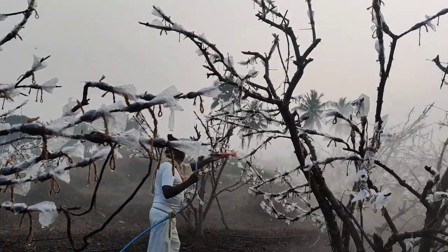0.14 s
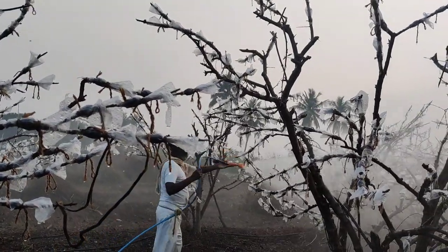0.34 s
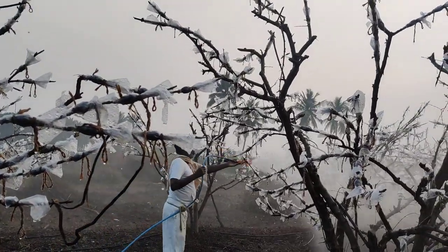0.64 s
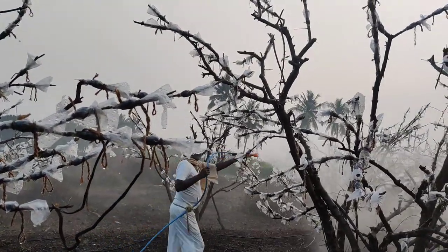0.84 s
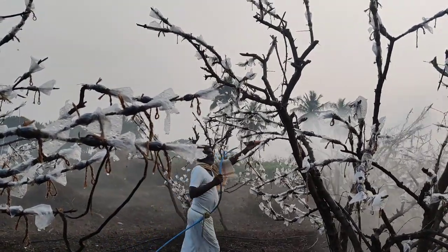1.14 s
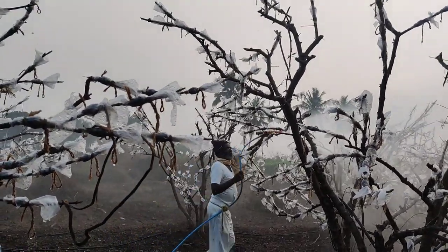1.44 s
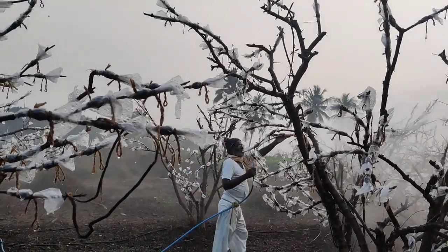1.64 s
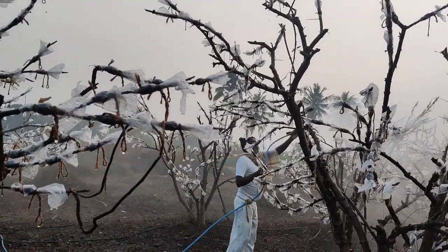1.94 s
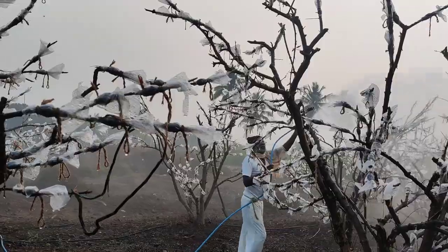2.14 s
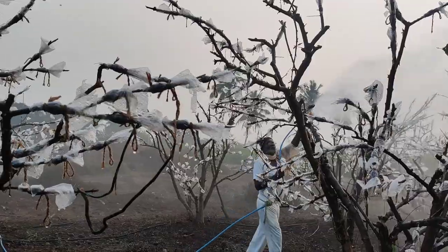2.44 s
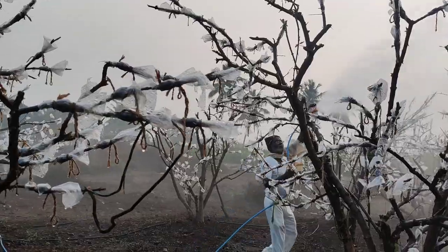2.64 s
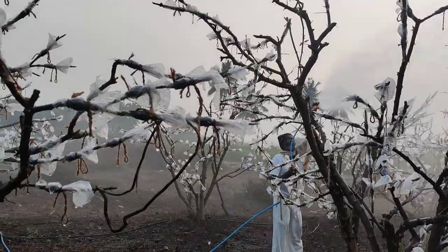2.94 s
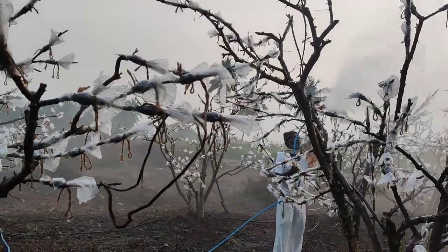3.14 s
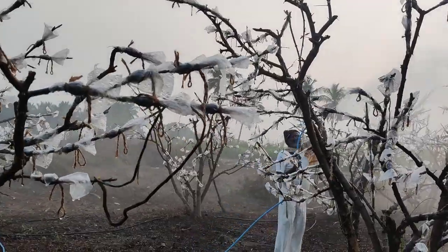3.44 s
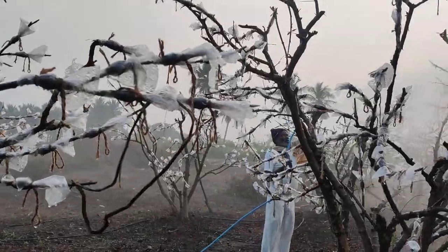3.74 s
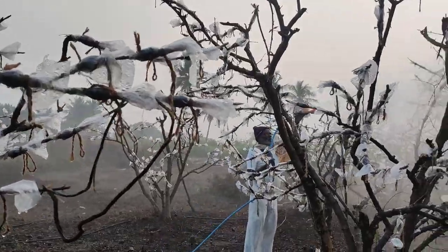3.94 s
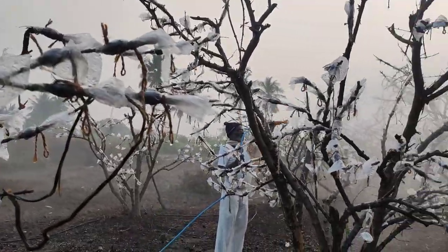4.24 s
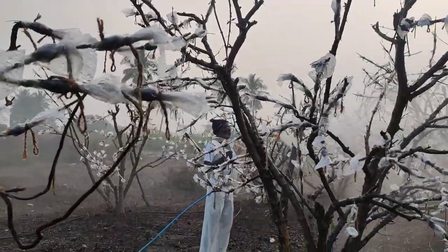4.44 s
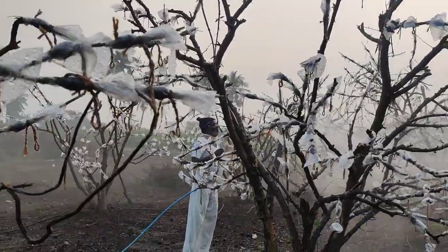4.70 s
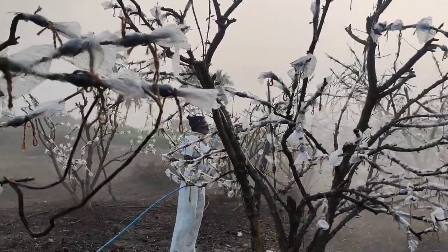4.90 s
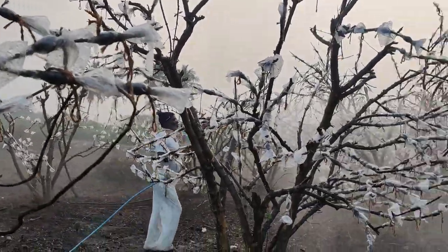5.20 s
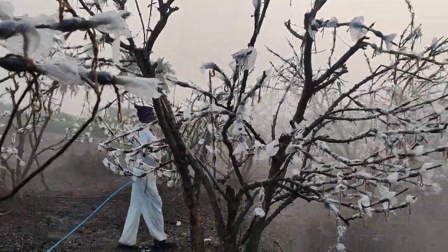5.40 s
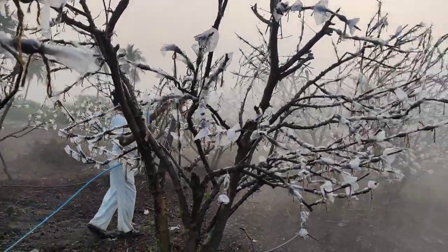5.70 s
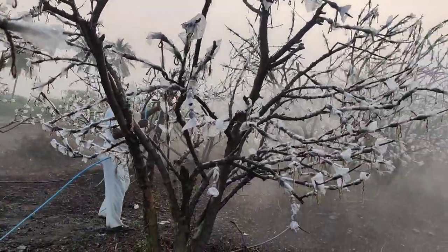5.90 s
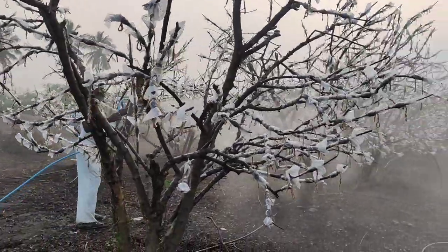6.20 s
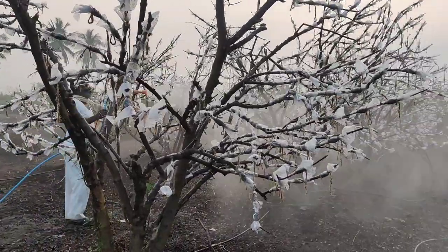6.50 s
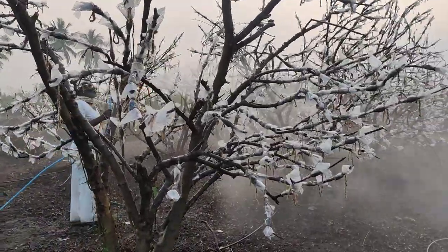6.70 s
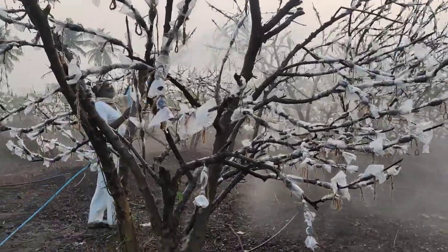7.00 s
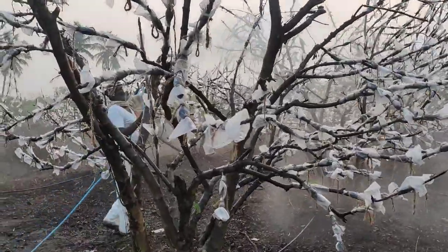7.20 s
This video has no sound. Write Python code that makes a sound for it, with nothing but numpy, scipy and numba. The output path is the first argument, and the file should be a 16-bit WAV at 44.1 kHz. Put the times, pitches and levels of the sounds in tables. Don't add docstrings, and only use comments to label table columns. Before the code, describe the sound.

A spray gun hisses loudly and continuously a few metres away, its tone shifting as it sweeps, over a faint thudding diesel pump engine.

```python
import sys
import numpy as np
from scipy import signal
from scipy.fft import rfft, irfft
from scipy.io import wavfile
from scipy.ndimage import uniform_filter1d
from numba import njit

SR = 44100
rng = np.random.default_rng(int(sys.argv[2]) if len(sys.argv) > 2 else 0)


def output_pcm(signal):
    pcm = np.clip(np.atleast_2d(signal).T, -1, 1) * 32767
    wavfile.write(sys.argv[1], SR, np.round(pcm).astype(np.int16))


def gain_from_db(level_db):
    decades = np.asarray(level_db, float) / 20
    return 10 ** decades


N = 324135
TIME_S, FREQ_HZ = np.arange(N) / SR, np.fft.rfftfreq(N, 1 / SR)

# start_s, level_db, aim_treble_db, bearing_left_minus_right_db
GUN_SWEEP = [(0.0, -41, -6.5, 2.5), (1.04, -36.5, -1, -2), (1.64, -38.5, -2.5, -2.5), (1.88, -39, -2.5, 0),
             (2.7, -37.5, 0, -3.5), (3.11, -38, -1, -2.5), (3.77, -37.5, 0.5, -2), (4.28, -38, -1, -2.5),
             (4.69, -39, -3.5, -4), (4.81, -40.5, -3, -3), (5.24, -43, -4, -1.5), (5.57, -42.5, -3, 0.5),
             (5.65, -42, -4.5, -2), (5.81, -41, -4, -1), (6.47, -40.5, -3.5, -2.0), (6.88, -39, -4.5, -2.5),
             (7.21, -38.5, -3.5, -1.0), (7.35, -40, -6, -3)]
JET_BANDS_HZ = [900, 2500, 5500, 10000]
# by_level_db_per_db, by_aim_db_per_db, by_bearing_db_per_db
BAND_FOLLOW = [
    (.3, 0.08, 0.033),
    (.7, -1.34, 0.1),
    (1.05, 0.94, 3.2),
    (1.05, .2, 0.82),
]
# freq_hz, density_db
SPRAY_SPECTRUM = [(100, -19), (200, -11), (400, 0.5), (1000, -3.5), (1600, -2.5), (2500, 1.5), (4000, -2),
                  (5500, -4), (7000, -5.5), (9000, -12.5), (12000, -11), (16000, -12.5)]
# freq_hz, level_re_direct_db
SCATTER_SPECTRUM = [(200, -12), (600, -13), (1200, -8), (3000, -5), (7000, -4.5), (14000, 1.5)]
# centre_s, spread_s, ridge_hz,
# width_hz, lift_db
NOZZLE_RIDGES = [(0.43, 0.083, 2260, 150, 8.5), (0.696, 0.23, 2480, 150, 5.5), (1.45, .3, 2520, 150, 4),
                 (3.6, 0.39, 2590, 201, 7.5), (5.722, 0.097, 3230, 250, 5), (6.7, 0.093, 2740, 200, 3.5),
                 (7.05, .25, 2650, 200, 4.5), (1, 0.29, 5000, 280, 6), (1, .3, 5800, 300, 3.5),
                 (1.847, 0.12, 5530, 250, 4), (2.605, 0.36, 5080, 300, 7), (3.297, 0.21, 8500, 2500, 2.5),
                 (3.944, 0.46, 5050, 300, 5), (3.95, .25, 6000, 400, 6.5), (4.65, 0.13, 4970, 250, 3.5),
                 (6.09, 0.36, 4800, 250, 6), (6.85, 0.12, 5100, 250, 0.5), (.05, 0.078, 2550, 250, 5),
                 (2.4, 0.63, 7600, 500, 4), (4.147, .15, 6900, 400, 6), (3.3, .2, 12500, 5000, 3.5),
                 (7, 0.25, 11500, 5000, 2.5)]
# centre_s, spread_s, centre_hz, width_hz,
# change_db
BRANCH_SHADE = [(1.3, 0.31, 4550, 630, -1.5), (1.7, 0.12, 2600, 600, 0.5), (3.1, 0.36, 3540, 370, -9),
                (3.94, 0.26, 4100, 950, -13), (3.3, 0.37, 6300, 860, -13.5), (3.3, .5, 583, 130, -11),
                (3.56, 0.6, 1530, 190, -7), (6.05, 0.094, 3900, 400, 2), (0.37, 0.68, 3070, 370, -4.5),
                (4.55, 0.43, 4600, 400, -4.5), (0.54, 0.35, 6800, 500, -4), (7.04, 0.36, 1360, 250, -5.5),
                (7.05, .25, 490, 120, -5)]
# start_s, right_direct_ms, left_soil_ms, right_soil_ms
ARRIVALS = [(0, .17, 1.12, 1.065), (.8, .16, 1.12, 1.055), (1.4, .13, 1.11, 1.0), (2, .09, 1.1, .95),
            (2.6, .085, 1.14, .935), (3.1, .07, 1.2, .92), (3.85, .045, 1.17, .89), (4.25, .13, 1.29, 1.04),
            (4.6, .17, 1.27, 1.09), (5.1, .19, 1.26, 1.11), (5.7, .27, 1.38, 1.28), (6.1, .27, 1.17, 1.08),
            (6.4, .32, 1.3, 1.22), (6.65, .31, 1.42, 1.42), (6.95, .28, 1.49, 1.43),
            (7.35, .255, 1.63, 1.56)]
# start_s, tilt_soil_to_facet (about -1.6 to 1), right_facing_db, right_soil_db
PHONE_TILT = [(0, -1.57, 2, -9.5), (.6, -1.25, -10, -7), (1.1, 0.085, -22, -5.5), (1.6, -0.61, -11, -5),
              (2, -0.96, -35.5, -7), (2.6, 0.16, -28.5, -5.5), (3.1, 1, -23, -9), (3.9, 1, -8.5, -4),
              (4.4, -0.23, -41, -4.5), (5, -0.8, -20, -6.5), (5.5, -1.03, -4.5, -3), (6, 0.53, -8, -7),
              (6.5, 0.67, -27.5, -1.5), (6.9, -0.75, -21, -2.5), (7.35, -0.87, -5, -2)]
GLINT_DB = (-8, -7)
TILT_DB = (-9.5, 7.5)
# least_ms, extra_ms, centre_s, spread_s
FACET_LAG = (.22, .17, 1.8, 1.1)
# delay_ms, level_db
EDGE_BEND = (.21, -1.5)
# left_soil_bass_db, left_facet_db, left_holder_db, right_holder_db
RETURN_DB = (-6.5, -16, -22.5, -12.5)
# centre_hz, width_hz, gain_db
LEFT_PORT = [(551, 113, -8), (870, 63, -2.5), (1640, 810, -4.5), (2730, 780, 0.5), (3390, 1130, -3.5),
             (5520, 250, 1.5), (6040, 1700, 4), (7600, 510, -2.5)]
RIGHT_PORT = [(1220, 830, 2.5), (2340, 3300, 2.5), (4560, 1060, -2), (5050, 530, 8), (6050, 300, 5.5),
              (6560, 520, 5.5), (8640, 2000, 6.5)]
# round_trip_ms, share
HAND_HOLLOW = [(0.368, 0.027), (0.39, 0.068)]
# start_s, firing_delay_ms
GOVERNOR_DRIFT = [(0, 16.7), (1.1, 16.6), (2, 17.9), (3.4, 18.1), (4.9, 17.0), (5.9, 16.9), (6.4, 17.3),
                  (7.35, 16.2)]
# centre_hz, width_hz, signed_gain
EXHAUST_MODES = [(103, 59, -2.9), (34.5, 68, 1.64), (156, 24, .85)]
# delay_ms, signed_share
THUD_RETURNS = [(18.9, -.26), (35.2, .26), (44.7, -.16)]
# freq_hz, density_db
RUMBLE_SPECTRUM = [(6, 0), (16, -1), (40, -1), (60, -5), (80, -10), (120, -14), (200, -14), (400, -21),
                   (900, -34)]


def spray():
    noise = nozzle(rng.standard_normal((3, N)))
    scatter = gain_from_db(log_curve(*np.transpose(SCATTER_SPECTRUM)))
    air = rfft(paths(noise[0])) + rfft(noise[1:]) * scatter
    air = air / np.sqrt(1 + scatter ** 2)
    air = air * gain_from_db(log_curve(*np.transpose(SPRAY_SPECTRUM)))
    air = air * [port(LEFT_PORT, HAND_HOLLOW[0]), port(RIGHT_PORT, HAND_HOLLOW[1])]
    loud_db, aim_db, bearing_db = (v - v.mean() for v in curves(GUN_SWEEP))
    out = 0
    flickers_db = (.1, .2, .4, .5)
    for share, (by_loud, by_aim, by_bearing), flicker_db in zip(np.eye(4), BAND_FOLLOW, flickers_db):
        band_db = by_loud * loud_db + by_aim * aim_db + flicker_db * walk(40)
        pan_db = by_bearing * bearing_db
        gain = gain_from_db(band_db + np.array([pan_db, -pan_db]) / 2)
        out = out + gain * irfft(air * log_curve(JET_BANDS_HZ, share), N)
    return set_rms(out, -35)


def nozzle(noise):
    out = noise.copy()
    for centre_s, spread_s, hz, width_hz, db in NOZZLE_RIDGES + BRANCH_SHADE:
        ends_s = [centre_s - 3 * spread_s, centre_s + 3 * spread_s]
        span = slice(*np.searchsorted(TIME_S, ends_s))
        swell = (gain_from_db(db) - 1) * bump(centre_s, spread_s)[span]
        out[:, span] += swell * np.array([band_pass(v[span], 1. * hz, 1. * width_hz) for v in noise])
    return out


def paths(jet):
    right_ms, left_soil_ms, right_soil_ms = curves(ARRIVALS)
    tilt, facing_db, soil_db = curves(PHONE_TILT)
    soil, facet = (gain_from_db(db + slope * tilt) for db, slope in zip(GLINT_DB, TILT_DB))
    least_ms, extra_ms, centre_s, spread_s = FACET_LAG
    edge_ms, edge_db = EDGE_BEND
    left_soil, left_facet, left_holder, right_holder = gain_from_db(np.array(RETURN_DB))
    treble = apply_gain(jet, 1 / (1 + (2890 / (FREQ_HZ + 1)) ** 4))
    bass = jet - treble

    left = jet + delay(left_soil * bass + gain_from_db(-11) * treble, left_soil_ms)
    left = left + left_holder * delay(bass, 1.92 * left_soil_ms)
    left = left + left_facet * delay(jet, left_soil_ms + .22)

    facing = gain_from_db(facing_db) * (treble + gain_from_db(edge_db) * delay(treble, edge_ms))
    right = delay(bass + facing, right_ms)
    right = right + delay(gain_from_db(soil_db) * bass + soil * treble, right_soil_ms)
    facet_ms = right_soil_ms + least_ms + extra_ms * bump(centre_s, spread_s)
    right = right + facet * delay(treble, facet_ms)
    right = right + right_holder * delay(bass, right_ms + 2.04)
    return np.array([left, right])


def port(modes, hollow):
    round_trip_ms, share = hollow
    gain = 1 / (1 - share * echo(round_trip_ms))
    for hz, width_hz, db in modes:
        off = detune(hz, width_hz)
        gain = gain * (off + gain_from_db(db / 2)) / (off + gain_from_db(-db / 2))
    return gain


def engine():
    firing_hz = 12.83
    start_s = np.arange(-1, int(N / SR * firing_hz) + 1) / firing_hz
    jitter, strength = rng.standard_normal((len(start_s), 2)).T
    late_ms = np.interp(start_s, *np.transpose(GOVERNOR_DRIFT)) - 9.3 + .12 * jitter
    at_s = start_s + late_ms / 1000
    pulses = np.bincount((at_s * SR).astype(int) % N, gain_from_db(.6 * strength) * (at_s > 0), N)
    ring = sum(gain / (1 + detune(hz, width_hz)) ** 2 for hz, width_hz, gain in EXHAUST_MODES)
    returns = sum(share * echo(ms) for ms, share in THUD_RETURNS)
    ring = ring * (1 + returns / (1 + (FREQ_HZ / 135) ** 8))
    thud = set_rms(apply_gain(pulses, ring / (1 + (FREQ_HZ / 300) ** 4)), -50)
    return np.array([thud * gain_from_db(-.8), delay(thud, .4) * gain_from_db(.8)])


def pump():
    pump_hz, width_hz = 26.5, 1.54
    turns = np.cumsum(pump_hz + width_hz / 2 * walk(2.2)) / SR
    hum = gain_from_db(1.6 * walk(2.27)) * np.cos(2 * np.pi * turns)
    return set_rms(hum, -56.0) * gain_from_db(np.array([[-1.6], [1.6]]))


def rumble():
    spectrum = gain_from_db(log_curve(*np.transpose(RUMBLE_SPECTRUM)))
    mid, side = apply_gain(rng.standard_normal((2, N)), spectrum)
    both = mid + gain_from_db(-10) * side * np.array([[1], [-1]])
    return set_rms(both, -51.0) * gain_from_db(1.0 * walk(1.83) + np.array([[-1.4], [1.4]]))


def set_rms(x, db):
    return x * gain_from_db(db) / np.sqrt(np.mean(x ** 2))


def log_curve(hz, values):
    return np.interp(np.log(FREQ_HZ + 1), np.log(hz), values)


def apply_gain(x, gain):
    return irfft(rfft(x) * gain, N)


def delay(x, ms):
    return np.interp(np.arange(N) - ms * SR / 1000, np.arange(N), x)


def echo(ms):
    return np.exp(-2j * np.pi * FREQ_HZ * ms / 1000)


def detune(hz, width_hz):
    return 1j * (FREQ_HZ / hz - hz / (FREQ_HZ + 1)) * hz / width_hz


def walk(rate_hz):
    hold = int(SR / rate_hz)
    steps = np.repeat(rng.standard_normal(N // hold + 1), hold)
    return 1.3 * uniform_filter1d(uniform_filter1d(steps, hold), hold)[:N]


def curves(table):
    start_s, *columns = np.transpose(table)
    return [np.interp(TIME_S, start_s, column) for column in columns]


def bump(centre_s, spread_s):
    return np.exp(-.5 * ((TIME_S - centre_s) / spread_s) ** 2)


@njit
def band_pass(x, hz, width_hz):
    y, band, low = np.empty(len(x)), 0., 0.
    g, damping = np.tan(np.pi * hz / SR), width_hz / hz
    for i in range(len(x)):
        v = (band + g * (x[i] - low)) / (1 + g * (g + damping))
        band = 2 * v - band
        low = low + 2 * g * v
        y[i] = damping * v
    return y


def scene():
    return spray() + engine() + pump() + rumble()


def roll_off(x):
    return signal.sosfilt(signal.butter(12, 16870, fs=SR, output="sos"), x)


def record(dry):
    top_hz = 15740
    mix = apply_gain(dry, FREQ_HZ < top_hz)
    return roll_off(mix)


dry = scene()
out = record(dry)
output_pcm(out)
```